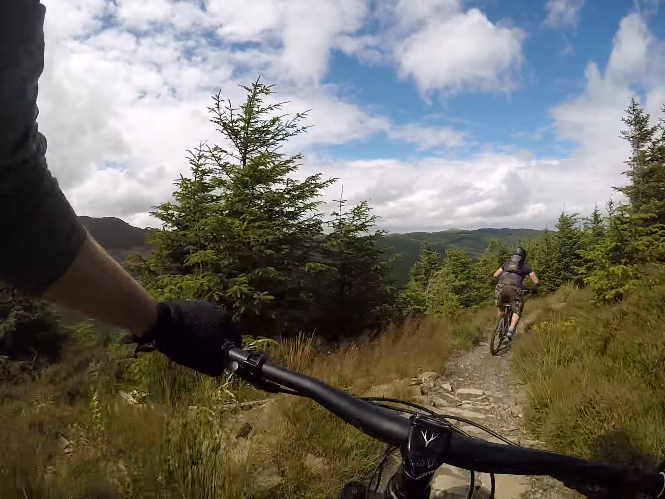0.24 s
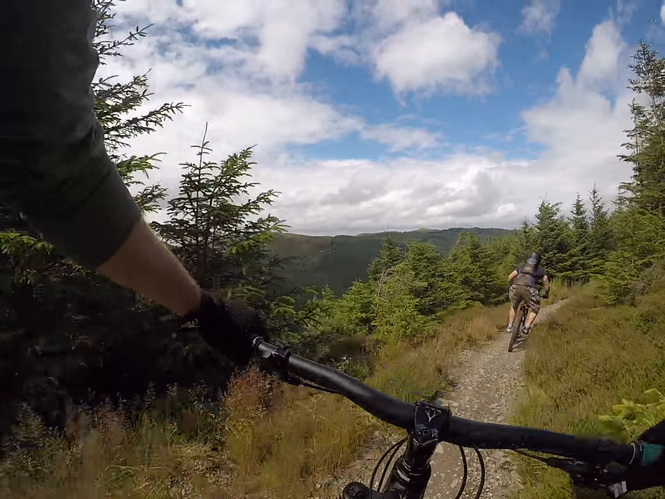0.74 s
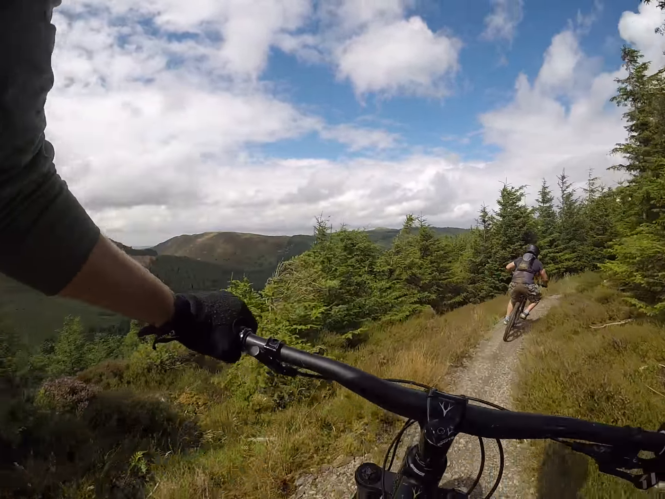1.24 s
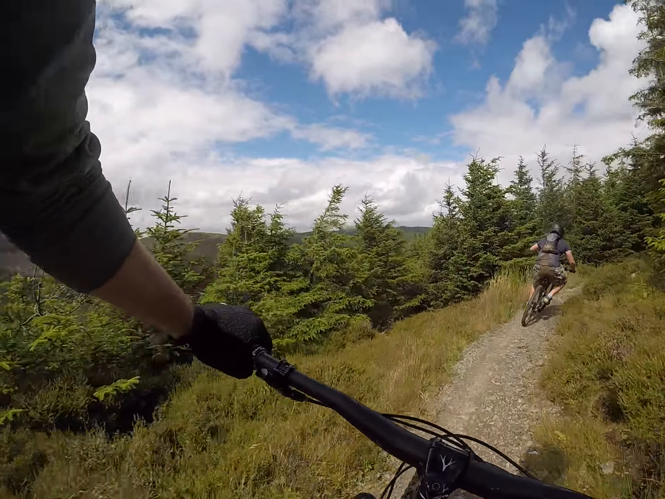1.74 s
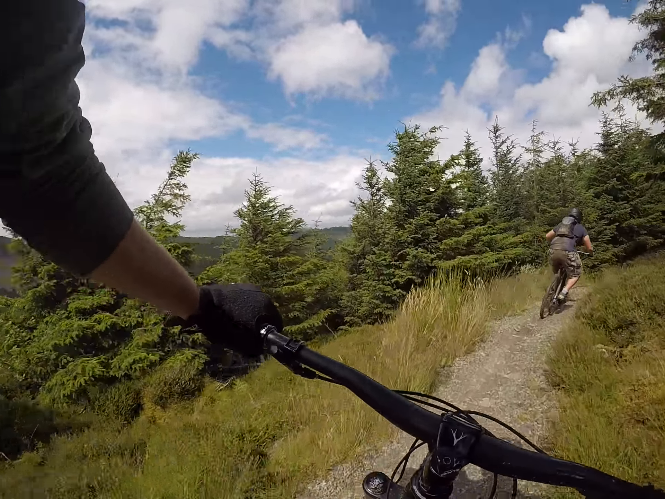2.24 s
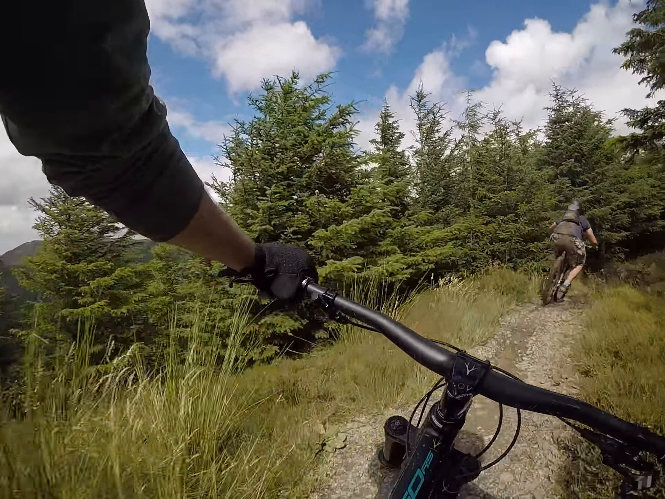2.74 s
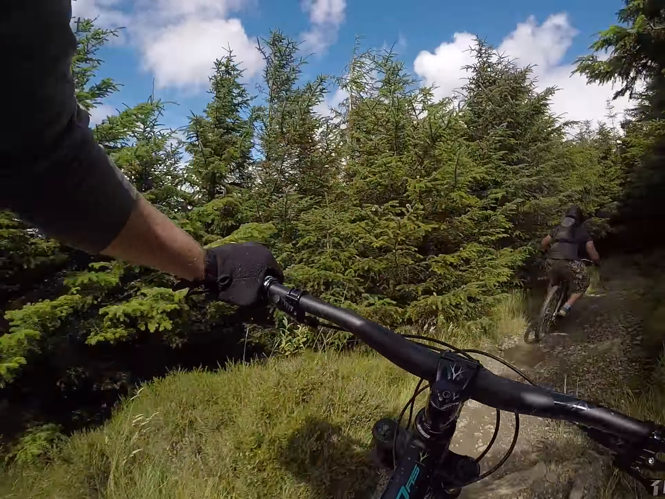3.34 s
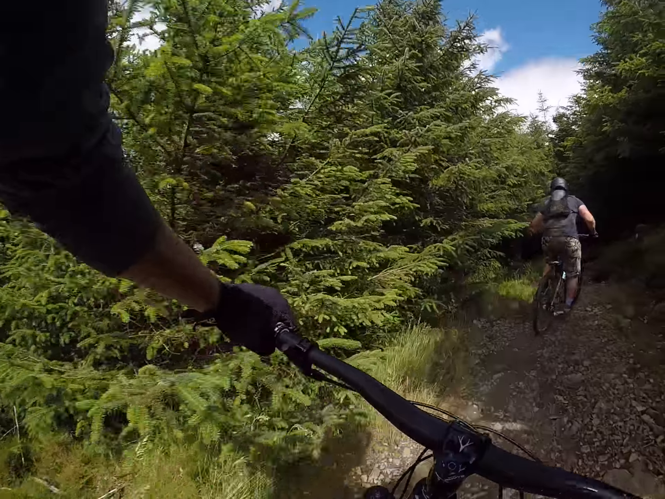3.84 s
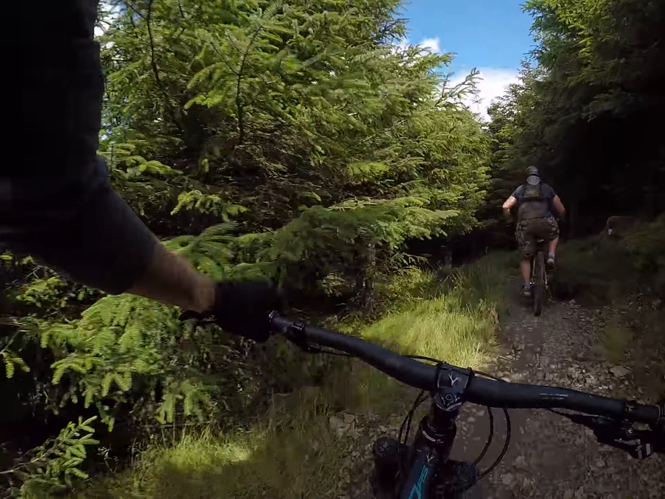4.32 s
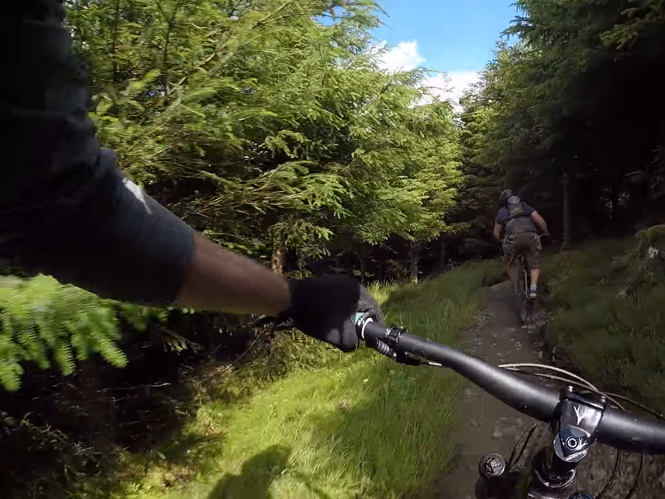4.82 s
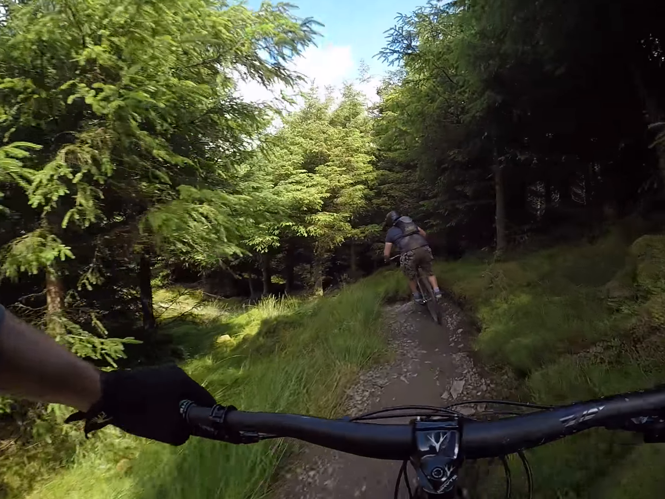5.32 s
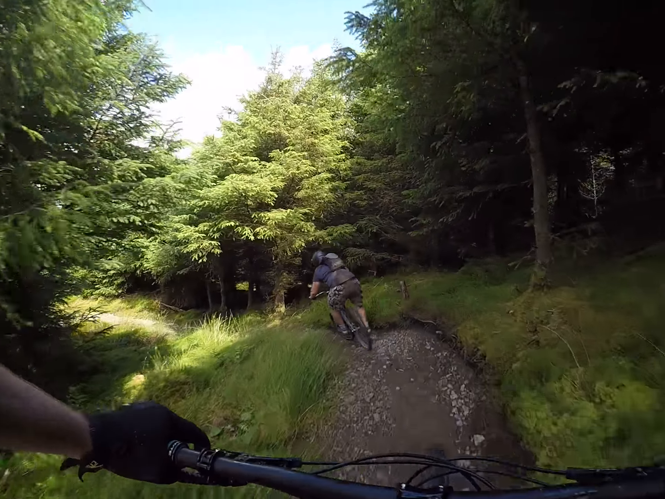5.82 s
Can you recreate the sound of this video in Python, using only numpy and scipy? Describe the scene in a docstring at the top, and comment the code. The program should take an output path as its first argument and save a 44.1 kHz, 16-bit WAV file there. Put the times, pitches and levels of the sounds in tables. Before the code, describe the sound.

Wind buffets a chest-worn microphone as a mountain bike rumbles fast down a gravel trail, stones ticking, frame clattering, brake humming late.

```python
"""Wind buffets a microphone on the chest of a rider whose mountain bike runs fast down a gravel forest trail.
The tyres rumble and crunch, loose stones tick against the bike, cables knock on the frame and chain and frame clatter.
A brake disc hums before the bend. Shaped noise makes the air and ground, bursts of tiny contacts make the blows,
and resonances or sines make the ringing parts; the case of the rider's camera colours the textures made by heard()."""
import sys
import numpy as np
from scipy import signal
from scipy.fft import rfft, irfft
from scipy.io import wavfile
from scipy.ndimage import uniform_filter1d

SR = 44100
rng = np.random.default_rng(int(sys.argv[2]) if len(sys.argv) > 2 else 0)


def store_wav(level_fs):
    """Save 16-bit WAV to argv[1]."""
    pcm = np.round(np.clip(np.atleast_2d(level_fs), -1, 1) * 32767)
    wavfile.write(sys.argv[1], SR, pcm.T.astype(np.int16))


N = 267687  # samples in the scene

# All levels are source levels, ahead of the mix and the soft rounding in record().
# gravel under the tyres: (time [s], crunch level [dB], hiss level of grit and grass [dB])
GRAVEL = [(0, -45.5, -56), (.25, -51.5, -55), (.55, -52, -53.5), (.88, -46, -52), (1.03, -42, -50),
          (1.15, -50, -57), (1.45, -52, -56.5), (2.0, -48.5, -56), (2.4, -46.5, -51), (2.95, -46.5, -50),
          (3.36, -44, -44), (3.48, -41, -53), (3.62, -38, -47), (3.79, -45, -50), (4.2, -47.5, -50),
          (4.65, -46.5, -48), (5.3, -52, -53), (6.07, -49, -51)]
# relative spectra: (frequency [Hz], level per Hz [dB])
RUMBLE_SPECTRUM = [(40, -38), (80, -9), (115, 4), (160, -1.5), (225, -4), (285, -26), (400, -26),
                   (800, -86)]
FLUTTER_SPECTRUM = [(130, -34), (215, -2), (280, 3), (335, -2), (395, -8), (500, -16.5), (750, -39.5),
                    (1200, -42), (2500, -64.5)]
KNOCK_SPECTRUM = [(300, -30), (750, 10), (1050, 1), (1500, 4.5), (2600, 10), (3500, 10.5), (6000, -51.5),
                  (12000, -33)]
TICK_SPECTRUM = [(1500, -33.5), (3500, 9.5), (5500, 9), (8200, -2), (10000, -11.5), (15000, -31)]
CLACK_SPECTRUM = [(250, 13), (500, 16.5), (800, 2), (1500, 4.5), (2200, 5.5), (3200, -2.5), (4500, -0.5),
                  (7000, -16.5), (15000, -46)]


def from_db(db):
    """Decibels to gain."""
    return 10 ** (np.asarray(db) / 20)


def rms_one(x):
    """Scale to rms 1."""
    return x / np.sqrt(np.mean(x ** 2) + 1e-20)


def gains_in_time(rows):
    """One gain per sample for each dB column of a curve."""
    times, *columns = np.transpose(rows)
    t = np.arange(N) / SR
    return [from_db(np.interp(t, times, column)) for column in columns]


def passing_gain(rows):
    """The gain of a curve that is silent outside its own span, with softened edges."""
    t = np.arange(N) / SR
    inside = 1. * (t > rows[0][0]) * (t < rows[-1][0])
    return gains_in_time(rows)[0] * uniform_filter1d(inside, size=400)


def bell(middle, half):
    """A gain that swells to 1 at the middle time and fades again, to 1/e after half seconds."""
    t = np.arange(N) / SR
    return np.exp(-np.minimum(((t - middle) / half) ** 2, 20))


def swell(s, rise, fall):
    """A gain that climbs to 1 over rise seconds from time s, then dies away with time constant fall."""
    t = np.arange(N) / SR - s
    return np.clip(t / rise, 0, 1) * np.exp(-np.clip((t - rise) / fall, 0, 20))


def drift(rate):
    """Low-passed noise that wanders about rate times a second; rms 1."""
    pole = np.exp(-2 * np.pi * rate / SR)
    noise = rng.standard_normal(N + SR)
    return rms_one(signal.lfilter([1], [1, -2 * pole, pole * pole], noise)[SR:])


def add(track, s, sound):
    """Mix a short sound into a track at time s."""
    start = int(np.clip(s * SR, 0, N - 1))
    track[start:start + len(sound)] += sound[:N - start]


def stretch(texture, size):
    """A random stretch of a texture."""
    start = rng.integers(len(texture) - size)
    return texture[start:start + size]


def case(x):
    """The camera's case: a chain of resonant peaks and dips."""
    # (frequency [Hz], width [Hz], peak or dip level [dB])
    case_peaks = [(559, 40, -33), (830, 190, 2.5), (1105, 58, -22.5), (1350, 410, 9), (4310, 1220, -6.5),
                  (6750, 740, 5.5), (11100, 2300, -5), (12530, 740, 9.5)]
    for hz, width, db in case_peaks:
        gain = from_db(db / 2)
        angle = 2 * np.pi * hz / SR
        alpha = np.sin(angle) * width / hz / 2
        middle = -2 * np.cos(angle)
        x = signal.lfilter([1 + alpha * gain, middle, 1 - alpha * gain],
                           [1 + alpha / gain, middle, 1 - alpha / gain], x)
    return x


def heard(x, spectrum, size=8192):
    """Give x a spectrum by a causal filter and pass it through the case; rms 1."""
    hz, db = np.transpose(spectrum)
    grid = np.maximum(np.fft.rfftfreq(size, 1 / SR), 1)
    cepstrum = irfft(np.log(from_db(np.interp(np.log(grid), np.log(hz), db))))
    # keeping only the positive times of the cepstrum makes the filter minimum-phase
    positive = cepstrum[:size // 2] * (np.arange(size // 2) > 0)
    response = irfft(np.exp(2 * rfft(positive, size)))
    # the end runs into the start, so the filters are already ringing at time 0
    looped = np.concatenate([x[-size:], x])
    return rms_one(case(signal.fftconvolve(looped, response))[size:size + N])


def resonant(x, hz, width):
    """Pass x twice through a resonance, for steep skirts; rms 1."""
    peak = signal.iirpeak(hz, hz / width, fs=SR)
    once = signal.lfilter(*peak, x)
    return rms_one(signal.lfilter(*peak, once))


def evened(x, seconds):
    """Hold the level of x steady over the given time."""
    power = uniform_filter1d(x ** 2, max(int(seconds * SR), 2))
    return x / np.sqrt(power + 1e-6)


def grains(per_s, spread_db):
    """Random tiny contacts of either sign, whose sizes scatter by spread_db; rms 1."""
    sizes = from_db(spread_db * np.minimum(rng.exponential(1, N), 4))
    signs = rng.choice([-1, 1], N)
    return rms_one(sizes * signs * (rng.random(N) < per_s / SR))


def burst(t60, rise, tail_db, tail_t60):
    """Envelope of a blow: the contacts build up, scatter away, and leave a fainter tail; peak 1."""
    t = np.arange(SR // 3) / SR
    build_up = 1 - np.exp(-(t / rise) ** 2)
    decay = from_db(-60 * t / t60) + from_db(tail_db - 60 * t / tail_t60)
    shape = build_up * decay
    return shape / shape.max()


def scuffed(shape, lead, scuff_db, swell_s):
    """Put a swelling scrape, lead seconds long, ahead of a blow."""
    before = int(lead * SR)
    t = np.arange(-before, len(shape)) / SR
    scrape = from_db(scuff_db) * np.exp(-np.abs(t - .002) / swell_s)
    return np.maximum(np.pad(shape, (before, 0)), scrape)


def struck(texture, shape):
    """A texture under a blow's envelope, with a steady energy."""
    return rms_one(stretch(texture, len(shape)) * shape) * np.sqrt(np.mean(shape ** 2))


def frame(contacts):
    """The frame's resonances, stirred by contacts; rms 1."""
    # resonances: (frequency [Hz], width [Hz], relative level [dB])
    frame_modes = [(330, 14, 0), (820, 49, 6.5), (1505, 45, 15), (1649, 62, 10.5), (2120, 130, 9.5),
                   (2500, 130, 6), (3270, 77, 11)]
    return rms_one(sum(from_db(db) * resonant(contacts, hz, width) for hz, width, db in frame_modes))


def wind_and_rumble():
    """Big eddies thump on the microphone, small ones flutter; the tyres drum, hardest on bumps."""
    # airflow over the microphone: (time [s], buffet level [dB])
    airflow = [(0, -15.5), (.12, -7), (.28, -20), (.44, -14), (.55, -14), (.8, -13), (1.45, -10.5),
               (1.7, -13.5), (2.3, -18), (3.02, -14), (3.33, -11), (3.82, -16.5), (3.9, -22), (4.12, -19.5),
               (4.33, -17.5), (5.0, -14.5), (5.22, -24.5), (6.07, -26.5)]
    # roughness of the ground under the tyres: (time [s], rumble level [dB])
    roughness = [(0, -19), (.45, -29), (.75, -23.5), (1.4, -25), (1.65, -31.5), (2.05, -25), (2.33, -27.5),
                 (2.86, -24.5), (3.0, -26.5), (3.62, -25), (3.95, -33.5), (4.3, -25), (4.62, -23),
                 (4.76, -19), (5.0, -20), (5.1, -26.5), (5.55, -33), (6.07, -37)]
    # drops over roots and ledges: (middle time [s], tyre drum level [dB], air jolt level [dB])
    drops = [(0.019, -12.5, -27), (0.206, -18.5, -17), (.55, -21.5, -12), (.63, -20, -11.5),
             (.76, -22, -9.5), (.85, -12.5, -8), (1.357, -40.5, -4.5), (1.55, -31, -5), (1.65, -26, -11.5),
             (1.77, -24, -28), (1.834, -35.5, -11), (1.941, -22.5, -11.5), (2.41, -21.5, -23),
             (2.487, -22, -12), (2.69, -20.5, -8.5), (2.76, -25.5, -23), (2.851, -16, -10.5),
             (2.939, -17, -22), (3.1, -16.5, -12), (3.187, -22, -8), (3.308, -19, -8.5), (3.366, -19, -16),
             (3.63, -13.5, -18), (3.719, -20, -17), (3.821, -25, -11), (4.0, -25.5, -17.5),
             (4.16, -20.5, -23), (4.252, -18, -13), (4.31, -23.5, -11.5), (4.46, -16.5, -11.5),
             (4.57, -30, -14.5), (4.73, -14.5, -14), (4.85, -22.5, -19), (5.021, -20, -10),
             (5.179, -22.5, -26), (5.361, -23, -13.5), (5.521, -36, -20), (5.61, -26.5, -27),
             (5.77, -28, -19.5)]
    # small eddies, before their share of the ride's swing: (time [s], flutter level [dB])
    flutter_level = [(0, -44.5), (.45, -37), (1.1, -30.5), (1.7, -37.5), (2.3, -36.5), (2.8, -34.5),
                     (3.9, -31), (4.35, -39), (4.9, -35.5), (5.27, -41), (6.07, -29)]
    # relative spectrum of the big eddies: (frequency [Hz], level per Hz [dB])
    buffet_spectrum = [(3, -35), (12, -3), (22, 2), (40, -1), (70, -3.5), (100, -13), (150, -28),
                       (300, -55), (600, -90)]
    flutter_follows = 0.59  # exponent: how far flutter follows the rumble's swing
    bump_half_s = 0.032

    buffet, rumble = gains_in_time(airflow)[0], gains_in_time(roughness)[0]
    for s, drum_db, jolt_db in drops:
        bump = bell(s, bump_half_s)
        rumble = np.maximum(rumble, from_db(drum_db) * bump)
        buffet = np.maximum(buffet, from_db(jolt_db) * bump)
    flutter = gains_in_time(flutter_level)[0] * (rumble / rumble.mean()) ** flutter_follows
    eddies = evened(heard(rng.standard_normal(N), buffet_spectrum), seconds=0.0587)
    drumming = evened(heard(rng.standard_normal(N), RUMBLE_SPECTRUM), seconds=0.0421)
    uneven_air = rng.standard_normal(N) * from_db(4.4 * drift(51))
    puffs = evened(heard(uneven_air, FLUTTER_SPECTRUM), seconds=0.085)
    return buffet * eddies + rumble * drumming + flutter * puffs


def soil():
    """Softer forest ground gives the tyres a deeper boom: noise through one low resonance."""
    # (time [s], boom level [dB])
    soil_level = [(4.15, -25), (4.27, -15), (4.6, -29), (4.78, -23), (5.1, -28), (5.35, -23), (5.47, -31)]
    boom = resonant(rng.standard_normal(N), hz=87, width=28)
    return passing_gain(soil_level) * evened(boom, seconds=0.04)


def gust_gains():
    """Each gust swells and fades; gains of its flutter and its tearing."""
    # gusts at the microphone: (middle time [s], half length [s], flutter level [dB], tearing level [dB])
    gust_rows = [(.003, 0.0097, -28.5, -53), (0.1, 0.06, -30, -41.5), (0.836, 0.072, -33, -45.5),
                 (0.984, 0.079, -37.5, -44.5), (1.105, 0.019, -22, -53), (1.144, 0.017, -16.5, -36),
                 (1.184, 0.016, -17.5, -34.5), (1.222, 0.021, -25, -39.5), (1.286, 0.01, -34, -42),
                 (1.341, 0.034, -25.5, -35.5), (1.43, 0.067, -29, -49.5), (1.51, 0.0069, -22, -35.5),
                 (1.552, 0.02, -22.5, -43), (2.131, 0.015, -20, -67), (2.84, 0.16, -30.5, -53.5)]
    middle, half, flutter_db, tear_db = np.transpose(gust_rows)
    bells = bell(middle[:, None], half[:, None])
    return from_db(flutter_db) @ bells, from_db(tear_db) @ bells


def gusts():
    """The strongest eddies boom and flutter, and tear at the microphone in a short rip on positive crests."""
    # relative spectrum of the rips: (frequency [Hz], level per Hz [dB])
    tear_spectrum = [(300, -15.5), (480, 14), (700, 5.5), (980, -6), (1500, -19.5), (2500, -15),
                     (6000, -51)]
    boom_db = 5  # the low boom, over the flutter
    flutter, tear = gust_gains()
    boom = evened(heard(rng.standard_normal(N), RUMBLE_SPECTRUM), seconds=0.0221)
    puffs = evened(heard(rng.standard_normal(N), FLUTTER_SPECTRUM), seconds=0.02)
    on_crests = rng.standard_normal(N) * from_db(6 * boom)
    rips = evened(heard(on_crests, tear_spectrum), seconds=.03)
    return flutter * (puffs + from_db(boom_db) * boom) + tear * rips


def lulls():
    """The airflow stalls and the wheels go light: a gain of brief dips; a negative depth lifts it."""
    # (middle time [s], half length [s], depth [dB])
    lull_rows = [(0.112, 0.0071, 7), (0.325, 0.023, 4), (0.454, 0.052, 5.5), (0.589, 0.022, 9),
                 (1.328, 0.013, 9), (1.599, 0.021, 6), (1.684, 0.022, 5.5), (1.82, 0.014, 4.5),
                 (2.27, 0.013, -3), (2.337, 0.015, 5.5), (2.997, 0.059, 3.5), (3.262, 0.013, 13),
                 (3.447, 0.018, 5), (4.091, 0.0078, 8), (4.61, 0.014, 3), (5.265, 0.02, 4.5),
                 (5.68, 0.019, 5), (5.972, 0.024, 7.5)]
    middle, half, depth_db = np.transpose(lull_rows)
    return from_db(-depth_db @ bell(middle[:, None], half[:, None]))


def cable():
    """A loose cable chatters on the bars: light, irregular taps, each a short ping on one of two modes."""
    # (time [s], chatter level [dB])
    chatter_level = [(4.35, -52), (4.6, -54.5), (4.8, -53), (5.06, -61)]
    low, high = grains(45, spread_db=1.5), grains(45, spread_db=1.5)
    pings = resonant(low, 2430, width=330) + resonant(high, 2780, width=270)
    return passing_gain(chatter_level) * rms_one(pings)


def squeaks():
    """A pad grazes the brake disc: a thin, unsteady sine with a slight upward trend."""
    # (time [s], middle pitch [Hz], level [dB], length [s])
    squeak_rows = [(1.14, 13500, -69, .04), (2.544, 13350, -58, 0.027), (2.859, 13250, -44, 0.046),
                   (2.941, 13900, -43, 0.023), (3.127, 13600, -49, 0.032)]
    out, waver = np.zeros(N), drift(300)
    for s, hz, db, length in squeak_rows:
        along = np.linspace(0, 1, int(length * SR))
        wobble = 0.0096 * np.roll(waver, -int(s * SR))[:len(along)]
        pitch = hz * (1 + .015 * (along - .5) + wobble)
        tone = np.sin(2 * np.pi * np.cumsum(pitch) / SR)
        add(out, s, from_db(db) * np.sin(np.pi * np.sqrt(along)) * tone)
    return out


def brake():
    """Each jolt makes the pads graze the disc, whose resonances hum, slide in pitch and die away unevenly."""
    # jolts before the bend: (time [s], hum level [dB], fading time constant [s])
    jolts = [(5.101, -40.5, 0.18), (5.405, -29, 0.078), (5.595, -35, .12)]
    # disc resonances: (multiple of the hum's mean pitch, width before the slide [Hz], relative level [dB])
    disc = [(.46, 12, -0.5), (0.504, 8.4, 6), (1, 49, 1.5), (1.09, 15, -7.5), (1.63, 24, -2),
            (1.77, 37, -5.5), (1.96, 25, -7)]
    # the hum falls after the first jolt; at the later two it dips and climbs back:
    # (time [s], pitch of its reference ring, multiple 1 [Hz])
    hum_pitch = [(5.11, 892.5), (5.189, 848.7), (5.3, 830), (5.405, 788), (5.48, 850), (5.549, 849),
                 (5.605, 804), (5.68, 865.6), (5.73, 851.7), (5.8, 858.6)]
    rise_s, rough_db = 0.011, 1.8

    times, hz = np.transpose(hum_pitch)
    mean_hz = hz.mean()
    rub, samples = rng.standard_normal(N), np.arange(N)
    hum = sum(from_db(db) * evened(resonant(rub, multiple * mean_hz, width), seconds=0.042)
              for multiple, width, db in disc)
    # reading the hum at a changing speed slides all its resonances together
    speed = np.interp(samples / SR, times, hz) / mean_hz
    sliding = np.interp(np.cumsum(speed) % N, samples, hum)
    grazing = rms_one(sliding * from_db(rough_db * drift(52)))
    return sum(from_db(db) * swell(s, rise_s, fall) for s, db, fall in jolts) * grazing


def rocks():
    """Tyres scrape over rocks and the bike shakes: dense, fine contacts stir the frame's resonances."""
    # rocky patch, before the 5.5 dB lift below: (time [s], rattle level [dB])
    rattle_level = [(3.452, -33), (3.468, -31.5), (3.524, -29.5), (3.542, -26.5), (3.58, -33),
                    (3.644, -27.5), (3.71, -53)]
    contacts = grains(9000, spread_db=1.5) * from_db(1.2 * drift(90))
    shaking = heard(contacts, CLACK_SPECTRUM) + from_db(-11) * frame(contacts)
    return from_db(5.5) * passing_gain(rattle_level) * evened(shaking, seconds=0.02)


def clatter():
    """Chain and cables slap the frame in tight flurries, each with its own pitch, over a dull thud."""
    # hard bumps: (time [s], clack level [dB], clack pitch [Hz], treble level [dB], thud level [dB],
    # build-up [s], rattle t60 [s])
    slaps = [(3.461, -39, 2500, -26.5, -14.5, 0.0042, 0.041), (3.529, -24, 1540, -44, -10.5, 0.0029, 0.045),
             (3.539, -24.5, 1800, -39, -33, 0.0045, .09), (3.562, -38, 1800, -45, -19.5, 0.0022, 0.07),
             (3.618, -25.5, 2090, -36, -43, 0.0043, 0.086), (3.639, -25, 1780, -56, -12.5, 0.0053, 0.11),
             (3.737, -29, 1930, -35.5, -19, 0.0064, 0.088), (5.098, -28.5, 2870, -44, -26.5, 0.0013, 0.16),
             (5.3413, -28, 1640, -39.5, -25, 0.0035, 0.028), (5.3838, -24, 2340, -28.5, -23, 0.0039, 0.035),
             (5.4031, -20.5, 2790, -28.5, -23.5, 0.0028, 0.081),
             (5.4469, -29, 2360, -32, -35, 0.0029, 0.098), (5.582, -26.5, 2770, -36.5, -26, 0.0019, 0.11)]
    # relative spectra: (frequency [Hz], level per Hz [dB])
    jingle_spectrum = [(1800, -0.5), (3500, 21.5), (4800, 19), (7000, 8.5), (8500, 5), (10000, -9),
                       (14000, -8), (16000, -83)]
    thud_spectrum = [(80, -42), (200, 5.5), (330, 14.5), (450, -11.5), (700, -7), (2000, -78.5)]
    frame_share = 0.49  # gain of the frame's ring in each clack

    out, lead = np.zeros(N), .02
    contacts = grains(12000, spread_db=.5)
    clacks = heard(contacts, CLACK_SPECTRUM)
    jingle = heard(contacts, jingle_spectrum)
    thud = heard(contacts, thud_spectrum)
    ringing = frame(contacts)
    for s, clack_db, hz, treble_db, thud_db, rise, t60 in slaps:
        blow = burst(max(t60, .01), rise, tail_db=-12.0, tail_t60=0.16)
        shape = scuffed(blow, lead, scuff_db=-12, swell_s=.005)
        broad = stretch(clacks, size=SR // 2)
        pitched = resonant(broad, hz, width=280)
        clack = rms_one(broad + 0.5 * pitched + frame_share * stretch(ringing, size=SR // 2))
        for texture, db in ((clack, clack_db), (jingle, treble_db), (thud, thud_db)):
            add(out, s - lead, from_db(db) * struck(texture, shape))
    return out


def knocks():
    """Cables knock on the hollow frame: a clack, slightly detuned ringing tube modes, and one rebound."""
    # (time [s], level of each of the four tube modes [dB] x 4, rebound delay [s])
    knock_rows = [(0.291, -56, -33, -38, -30.5, .0022), (0.42, -67, -57, -52, -34.5, 0.0037),
                  (2.972, -54, -55, -40, -32, 0.0038), (3.2686, -48, -29, -29, -29, 0.0022),
                  (3.433, -58, -48, -43, -28.5, 0.002), (3.804, -36, -26.5, -29.5, -24, 0.0043),
                  (3.955, -58, -46, -26.5, -25, 0.0038), (4.116, -56, -42, -33, -36, 0.0033),
                  (4.292, -60, -56, -37, -37, 0.0022), (4.421, -52.5, -39, -33, -26, 0.0043),
                  (4.572, -58, -46, -35, -31.5, 0.0032), (4.638, -38, -41, -35, -23.5, 0.0049),
                  (4.722, -49, -31.5, -30.5, -36, 0.00199), (4.7725, -56, -46, -43, -26.5, .003),
                  (5.022, -60, -57, -52.5, -31, 0.0052), (5.343, -58, -42, -31, -29, .003),
                  (5.384, -51, -38, -38, -24, 0.0053), (5.4053, -50, -29, -30, -30, 0.0064),
                  (5.451, -53, -38, -39, -30, 0.00335)]
    # modes of the frame's tubes: (frequency [Hz], t60 [s])
    tube = [(950, 0.082), (1430, 0.034), (2000, 0.045), (2470, 0.022)]
    rebound_db, contact_db = -3, -7  # relative to the first ring; relative to the loudest mode
    rise_s, detune = .0007, .04  # detune is a spread, as a fraction of the pitch

    out, t = np.zeros(N), np.arange(SR // 10) / SR
    hz, t60 = np.transpose(tube)[:, :, None]
    dying = from_db(-60 * t / t60) * (1 - np.exp(-t / rise_s))
    clack = heard(rng.standard_normal(N), KNOCK_SPECTRUM)
    touch = from_db(-60 * t / .014)
    for s, *mode_db, rebound in knock_rows:
        add(out, s, from_db(max(mode_db) + contact_db) * struck(clack, touch))
        for delay, db in ((0, 0), (rebound, rebound_db)):
            pitch = hz * (1 + detune * rng.standard_normal(hz.shape))
            rings = dying * np.sin(2 * np.pi * pitch * t)
            add(out, s + delay, from_db(db) * from_db(mode_db) @ rings)
    return out


def pebbles(count=60):
    """Random small stones, as rows like those of the loud ones; harder where the gravel is coarse."""
    per_s, hz, t60 = 12, 2000, 0.016  # pitch varies by half an octave either way
    knock_db, tick_db, spread_db = 5.5, -1, 9.5  # levels over the crunch, and spread either way
    times, crunch_db, _ = np.transpose(GRAVEL)
    place, chance = rng.random((2, count))
    knock, tick, octaves = rng.uniform(-1, 1, (3, count))
    s = place * N / SR
    db = np.interp(s, times, crunch_db)
    rows = np.transpose([s, db + knock_db + spread_db * knock, hz * 2 ** (octaves / 2),
                         db + tick_db + spread_db * tick, np.full(count, t60)])
    return list(rows[chance < per_s * N / SR / count])


def stones():
    """Each stone scuffs, then knocks at a pitch of its own, with a bright tick from its hard edge."""
    # loudest stones: (time [s], knock peak level [dB], knock pitch [Hz], tick level [dB],
    # scatter t60, held to 0.008 or more [s])
    loud_stones = [(0.074, -27, 1870, -46, 0.022), (0.0968, -31.5, 1590, -39.5, 0.071),
                   (0.137, -32, 1490, -46, 0.024), (0.1502, -31, 1780, -39.5, 0.029),
                   (0.302, -53, 2090, -44.5, 0.017), (.365, -35, 2120, -46, 0.02),
                   (0.754, -39, 1800, -53, 0.02), (0.804, -45, 2000, -40, 0.016),
                   (.499, -36.5, 2000, -57, .03), (0.637, -35, 1700, -52, .016),
                   (0.8694, -28, 2400, -46, 0.016), (1.8772, -34, 1800, -59, .012),
                   (2.368, -38, 1700, -56, 0.015), (2.67, -34.5, 2000, -55, .014),
                   (0.6635, -25.5, 2190, -33.5, 0.031), (0.733, -51, 1560, -36, 0.016),
                   (0.707, -42, 2400, -42, 0.031), (0.787, -22, 2130, -41, 0.045),
                   (0.851, -28.5, 1420, -38.5, 0.023), (0.959, -25.5, 1900, -40, 0.028),
                   (1.013, -20, 2080, -44, 0.017), (1.071, -25, 1600, -61, 0.023),
                   (1.206, -30, 1540, -49, 0.037), (1.245, -30.5, 1470, -46, 0.04),
                   (1.347, -34, 1440, -61, 0.028), (1.746, -57, 1770, -42, 0.015),
                   (2.337, -51, 2050, -45, 0.029), (1.6117, -41, 2200, -38.5, 0.031),
                   (1.674, -40.5, 1440, -43, 0.064), (1.816, -28.5, 1520, -47, 0.011),
                   (1.8445, -36, 1500, -37, 0.025), (1.9485, -22, 2000, -44, 0.012),
                   (2.1925, -48, 1890, -42, 0.07), (2.561, -47, 1410, -37.5, 0.041),
                   (2.617, -37, 1830, -35.5, 0.035), (2.834, -28, 1940, -38, 0.2),
                   (2.91, -35, 2030, -33.5, 0.01), (3.1048, -48, 1460, -39.5, 0.25),
                   (3.1475, -26.5, 1730, -50, 0.085), (3.3076, -59, 2070, -30, 0.017),
                   (3.379, -30, 1940, -34.5, 0.027), (3.511, -33, 2000, -30, 0.014),
                   (3.572, -21, 2460, -33, 0.03), (3.599, -18, 1900, -39, 0.049),
                   (3.632, -17.5, 2110, -42, 0.033), (3.679, -33, 2300, -43, 0.02),
                   (4.3703, -41, 2610, -33.5, 0.013), (4.395, -39, 1430, -39, 0.045),
                   (4.486, -29, 1830, -42, 0.023), (4.632, -28.5, 2400, -45, 0.055),
                   (4.653, -26.5, 1600, -38, 0.048), (4.742, -42, 1380, -42, 0.023),
                   (4.5145, -36, 2400, -39, .016), (4.8703, -22, 1920, -36, 0.042),
                   (4.943, -44, 2580, -37.5, 0.025), (5.18, -32, 2240, -45.5, 0.04),
                   (5.417, -21.5, 2870, -44, 0.0078), (5.467, -25, 2600, -51, 0.023),
                   (5.7568, -42, 2000, -55, .015), (5.605, -35, 2500, -43, 0.0093),
                   (6.0081, -27.5, 1820, -38, 0.15)]
    out, lead = np.zeros(N), .02
    knocking = heard(grains(6000, spread_db=2.0), KNOCK_SPECTRUM)
    ticking = heard(grains(5000, spread_db=3.5), TICK_SPECTRUM)
    for s, knock_db, hz, tick_db, t60 in loud_stones + pebbles():
        blow = burst(max(t60, .008), rise=.001, tail_db=-25, tail_t60=.28)
        shape = scuffed(blow, lead, scuff_db=-7.5, swell_s=0.2 * np.clip(t60, .008, .04))
        contact = stretch(knocking, size=SR // 2)
        knock = struck(resonant(contact, hz, width=850) + contact, shape)
        tick = struck(ticking, shape)
        add(out, s - lead, from_db(knock_db) * knock / np.abs(knock).max() + from_db(tick_db) * tick)
    return out


def snaps():
    """Chips of grit under the tyres scratch briefly and let go with a bright crack."""
    # (time [s], level [dB])
    snap_rows = [(.099, -37), (0.19, -45), (.2114, -47), (.2198, -47), (.5125, -62), (.617, -43),
                 (.6514, -35), (.803, -40), (1.0212, -36), (1.0583, -40), (1.7955, -47), (1.931, -44.5),
                 (2.1438, -44), (2.305, -47), (2.509, -46), (2.5622, -30.5), (2.8217, -46), (3.0036, -40),
                 (3.03, -39), (3.0925, -41), (3.131, -32), (3.227, -39), (3.334, -41), (3.8483, -48),
                 (4.623, -48), (5.012, -43), (5.6135, -38), (5.699, -44), (5.805, -43), (5.899, -15)]
    # relative spectrum: (frequency [Hz], level per Hz [dB])
    snap_spectrum = [(900, -35), (1900, -1), (4500, 1), (6200, -0.5), (7200, 3.5), (8300, 2.5),
                     (9500, -11.5), (13500, -13), (15500, -14)]
    out, lead = np.zeros(N), .03
    crack = heard(rng.standard_normal(N), snap_spectrum)
    blow = burst(0.019, rise=0.00029, tail_db=-17, tail_t60=0.051)
    shape = scuffed(blow, lead, scuff_db=-15.5, swell_s=0.011)
    for s, db in snap_rows:
        add(out, s - lead, from_db(db) * struck(crack, shape))
    return out


def gravel():
    """Stones grind and pop under the tread; fine grit sprays, grass brushes past and odd chips click."""
    # relative spectra: (frequency [Hz], level per Hz [dB])
    crunch_spectrum = [(200, -34.5), (500, 17.5), (800, 4), (1400, 3), (2200, 5.5), (3200, 3), (4500, -0.5),
                       (8000, -12.5), (15000, -26.5)]
    hiss_spectrum = [(1500, -28), (3000, -1), (4300, 3), (6800, -3), (8700, -6), (10000, -11), (13000, -14),
                     (15500, -18)]
    crunch, hiss = gains_in_time(GRAVEL)
    clumps = drift(49)  # shared, so grinding and spray swell together
    grinding = grains(3500, spread_db=-0.5) * from_db(2.0 * clumps + 1.0 * drift(31))
    coarse = evened(heard(grinding, crunch_spectrum), seconds=0.19)
    spray = grains(9000, spread_db=2.5) * from_db(0.37 * clumps + 3.5 * drift(27))
    fine = evened(heard(spray, hiss_spectrum), seconds=0.4)
    chips = heard(grains(70, spread_db=2.6), TICK_SPECTRUM)
    pops = heard(grains(110, spread_db=2.2), crunch_spectrum)
    return crunch * (0.83 * coarse + from_db(-5.5) * pops) + hiss * (0.8 * fine + from_db(-10.5) * chips)


def scene():
    """All sources at one microphone, in the open air."""
    bike = stones() + knocks() + clatter() + rocks() + cable() + brake() + squeaks()
    air_and_ground = lulls() * (wind_and_rumble() + soil() + gusts())
    return (air_and_ground + gravel() + snaps() + bike)[None]


def record(dry):
    """The loudest peaks are rounded off and the top is cut."""
    cutoff_hz = 15600
    rounded = 1.408 * np.tanh(dry / 1.65)
    low_pass = signal.ellip(10, .1, 90, cutoff_hz, fs=SR, output="sos")
    return signal.sosfilt(low_pass, rounded)


dry = scene()
out = record(dry)
store_wav(out)
```